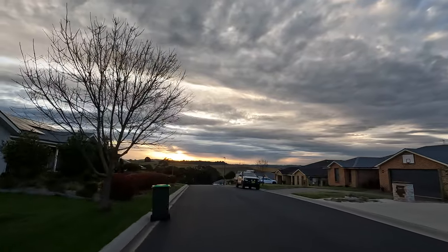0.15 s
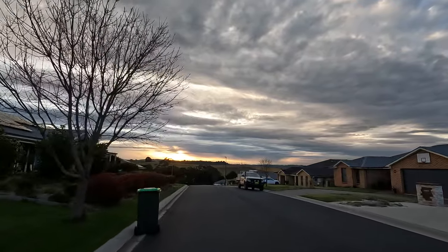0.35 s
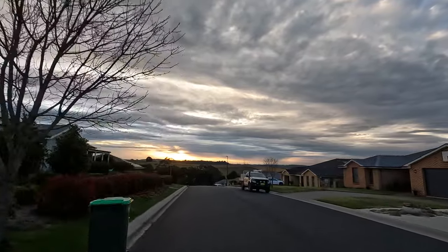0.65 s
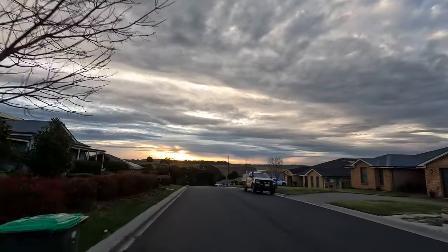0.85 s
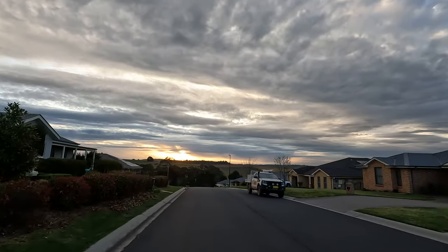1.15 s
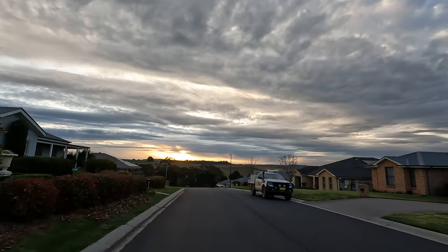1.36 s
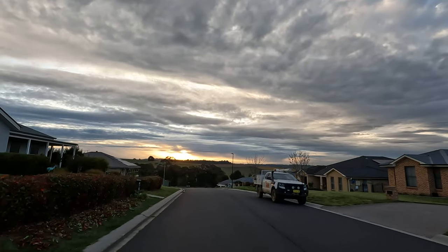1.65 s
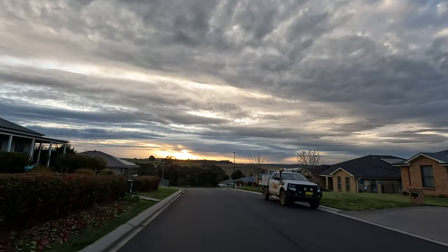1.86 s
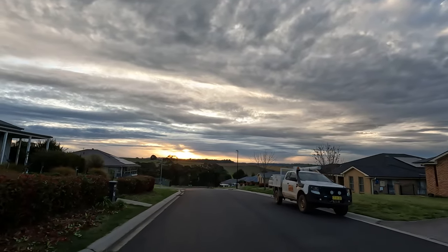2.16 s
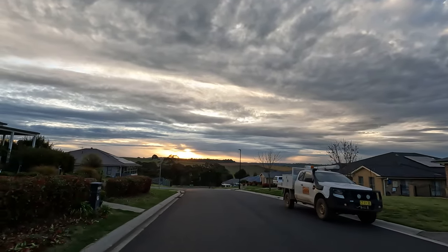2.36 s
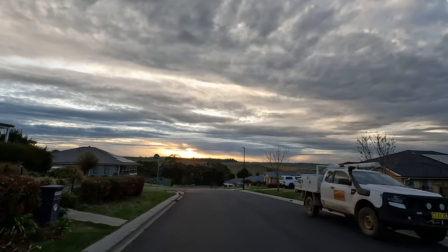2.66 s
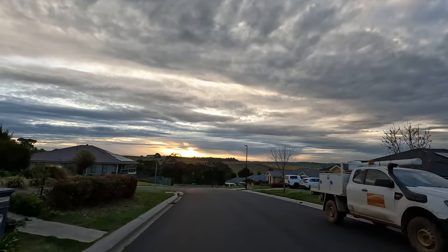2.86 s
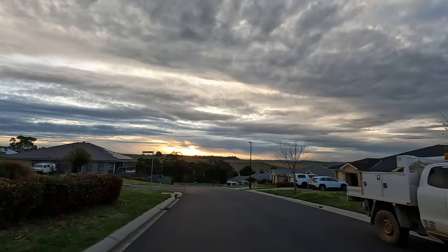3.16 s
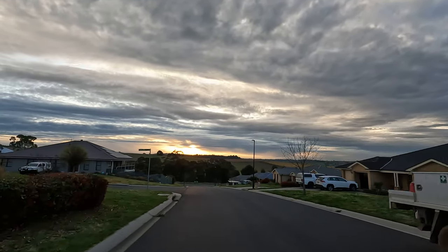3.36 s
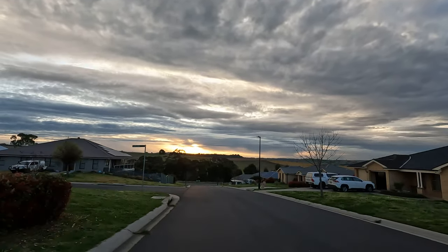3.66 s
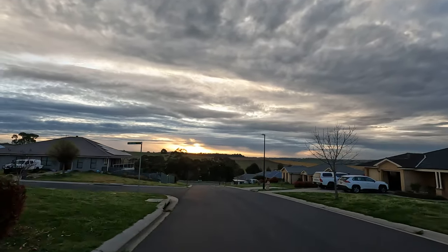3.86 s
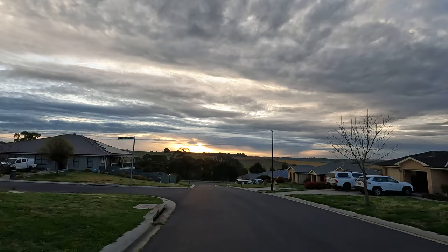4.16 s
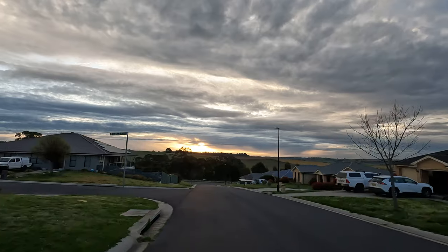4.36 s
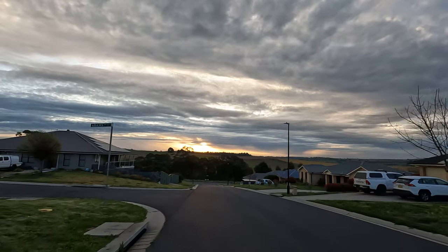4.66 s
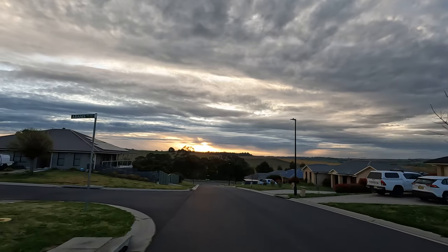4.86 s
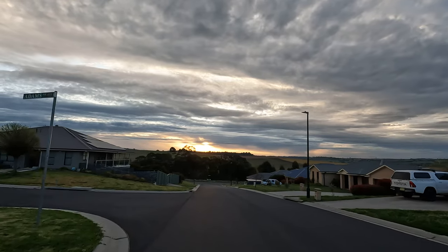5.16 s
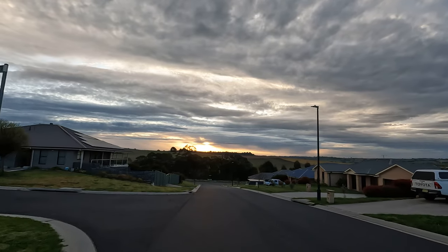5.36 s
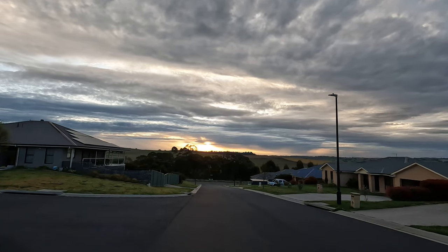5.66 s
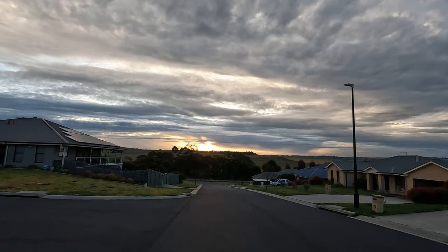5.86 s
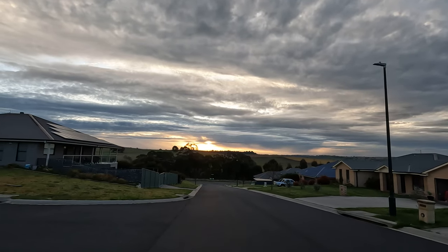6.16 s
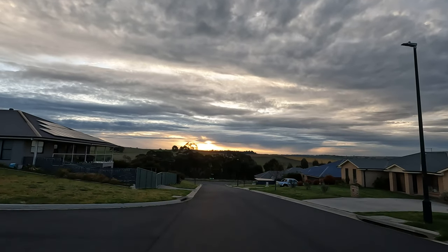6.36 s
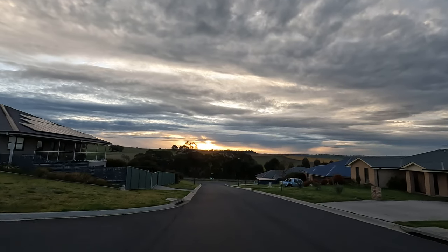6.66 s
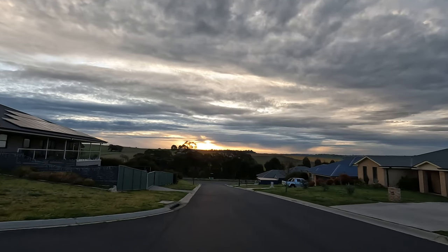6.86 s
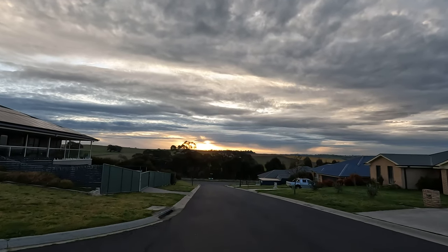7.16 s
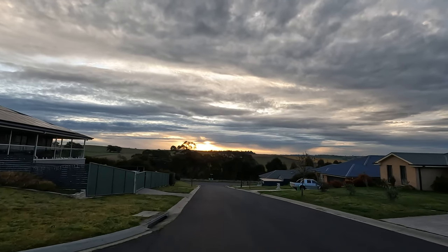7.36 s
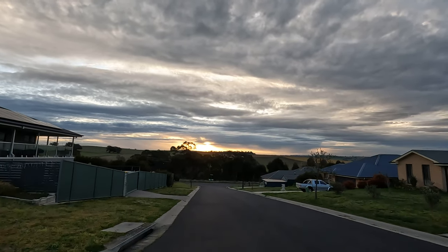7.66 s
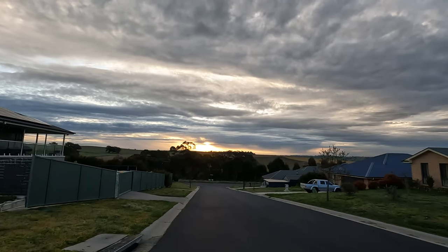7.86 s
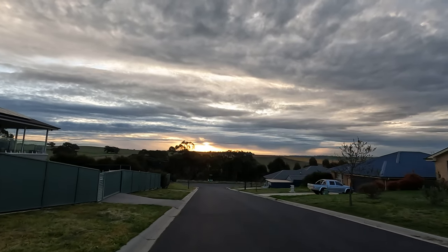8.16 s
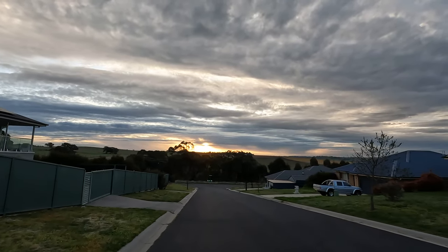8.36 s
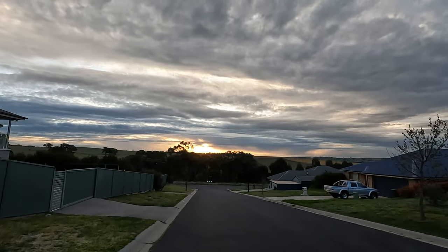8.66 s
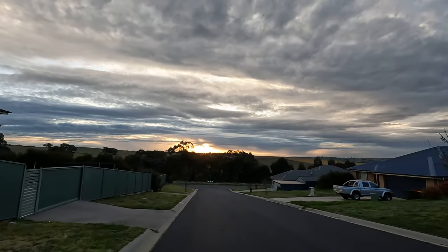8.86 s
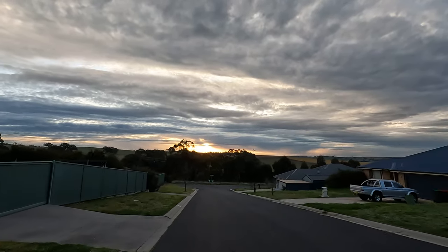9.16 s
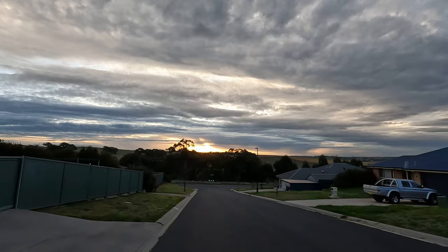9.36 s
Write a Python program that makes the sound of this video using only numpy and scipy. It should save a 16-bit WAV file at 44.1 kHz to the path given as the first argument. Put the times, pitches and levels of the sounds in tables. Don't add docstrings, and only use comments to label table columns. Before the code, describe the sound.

An electric scooter's steady motor hum rides over wind rumble and tyre roar on asphalt, a stone cracks the deck, and the motor judders at the end.

```python
import sys
import numpy as np
from scipy import signal
from scipy.fft import rfft, irfft, next_fast_len
from scipy.io import wavfile
from scipy.ndimage import uniform_filter1d

SR = 44100
rng = np.random.default_rng(int(sys.argv[2]) if len(sys.argv) > 2 else 0)


def transcribe(signal):
    frames = np.atleast_2d(signal).T
    limited = np.clip(frames, -1, 1)
    pcm = np.round(limited * 32767).astype(np.int16)
    wavfile.write(sys.argv[1], SR, pcm)


def natural_amplitude(level_db):
    exponent = np.asarray(level_db, float) / 20
    return 10 ** exponent


N = 419832
TIME = np.arange(N) / SR


def rms_one(x):
    return x / np.sqrt(np.mean(x ** 2) + 1e-20)


def in_time(rows):
    s, *columns = np.transpose(rows)
    return [np.interp(TIME, s, c) for c in columns]


def swell(s, attack_s, hold_s, release_s):
    return np.interp(TIME, s + np.cumsum([0, attack_s, hold_s, release_s]), [0, 1, 1, 0])


def drift(rate):
    thin, settle = 40, 2000
    r = np.exp(-2 * thin * np.pi * rate / SR)
    white = rng.standard_normal(N // thin + settle + 2)
    slow = signal.lfilter([1], [1, -2 * r, r * r], white)[settle:]
    return np.interp(np.arange(N) / thin, np.arange(len(slow)), rms_one(slow - slow.mean()))


def coloured(spectrum, patchy_db, rate):
    hz, db = np.transpose(spectrum)
    size = next_fast_len(N)
    octave = np.log2(np.maximum(np.fft.rfftfreq(size, 1 / SR), 1))
    shaped = rfft(rng.standard_normal(size)) * natural_amplitude(np.interp(octave, np.log2(hz), db, -120, -120))
    out, together = 0, drift(rate / 3)
    for centre in np.arange(np.log2(hz[0]), np.log2(hz[-1]) + .5, .5)[:10]:
        band = np.cos(np.pi * np.clip(octave - centre, -.5, .5)) ** 2
        flicker_db = patchy_db * (0.81 * together + drift(rate))
        out = out + natural_amplitude(flicker_db) * irfft(shaped * band, size)[:N]
    return rms_one(out)


def resonant(x, hz, width_hz):
    r = np.exp(-np.pi * width_hz / SR)
    poles = [1, -2 * r * np.cos(2 * np.pi * hz / SR), r * r]
    return signal.lfilter(np.array([1, 0, -1]) * (1 - r * r) / 2, poles, x)


def narrow_noise(hz, width_hz):
    return rms_one(resonant(resonant(rng.standard_normal(N), hz, width_hz), hz, width_hz))


def tone(hz):
    return np.sqrt(2) * np.sin(2 * np.pi * np.cumsum(hz) / SR)


def puff(white, peak_ms):
    x = 1000 * np.arange(len(white)) / SR / peak_ms
    return white * x * np.exp(1 - x)


def hush():
    drops_s, rise_s = 4.96, 1
    return 1 - np.exp(-np.maximum(TIME - drops_s, 0) / rise_s)


def lull():
    return swell(5.27, attack_s=.11, hold_s=.11, release_s=.22)


# (time [s], magnet tone [Hz], hum level [dB], deck ringing [dB])
MOTOR_PULLS = [(0, 315.7, -24.5, -29), (.5, 313.4, -24.5, -29.5), (1.3, 313.6, -23.5, -31),
               (1.9, 317, -27.5, -33.5), (2.22, 317.8, -22.5, -24.5), (2.75, 320.5, -25.5, -37),
               (3.05, 323, -25, -32), (3.42, 324.6, -42.5, -46), (3.55, 321.4, -55, -41),
               (3.75, 314, -34.5, -31.5), (4.1, 320.5, -29, -33), (4.7, 319.7, -29, -29.5),
               (5.2, 320.2, -33.5, -36), (5.4, 326.3, -38.5, -36), (6.05, 329, -38.5, -37),
               (6.4, 335.3, -54, -36.5), (8.1, 313, -57, -31.5), (9.52, 302, -62.5, -37)]
# (time [s], length [s], change [dB])
DRIVE_SLACK = [(3.6, .12, -10), (4.03, .02, -4), (4.34, .05, -5), (4.46, .1, 2), (4.84, .02, -7),
               (5.04, .03, -3), (5.19, .05, 4), (5.3, .04, -4), (5.52, .02, -3), (6.03, .04, -4),
               (6.2, .1, 7)]


def motor():
    deck_hz, deck_width_hz, edge_s = 336.7, 28, .03
    hz, hum_db, deck_db = in_time(MOTOR_PULLS)
    loose = np.clip((TIME - 3.5) / 2, 0, 1)
    hz = hz + (.4 + 1.6 * loose) * drift(6.0)
    hum_db = hum_db + sum(db * swell(s, edge_s, length, edge_s) for s, length, db in DRIVE_SLACK)
    hum = tone(hz) * natural_amplitude((1.0 + 1.5 * hush()) * drift(27.0)) + natural_amplitude(-25.5) * tone(2 * hz)
    deck = 0.5 * narrow_noise(deck_hz, deck_width_hz)
    deck = deck + (0.45 - 0.15 * hush()) * tone(deck_hz + 17 * drift(13.78))
    still_db = -9 * swell(8.44, attack_s=.05, hold_s=.62, release_s=.05)
    return natural_amplitude(hum_db) * hum + natural_amplitude(deck_db + still_db + 1.2 * drift(9.1)) * deck


# (time [s], length [s], start pitch [Hz], end pitch [Hz], level [dB])
JUDDER_SURGES = [(8.5, .11, 314, 330, -27), (8.63, .065, 322, 342, -25), (8.72, .16, 318, 322, -27.5),
                 (8.88, .06, 326, 350, -28), (8.945, .05, 350, 342, -28.5), (9.01, .07, 324, 350, -26),
                 (9.13, .04, 330, 324, -35), (9.26, .04, 330, 338, -35), (9.355, .025, 335, 331, -27),
                 (9.41, .025, 328, 324, -30), (9.5, .02, 335, 340, -31)]


def judder():
    edge_s, grows_db = 0.014, 2
    s, length, from_hz, to_hz, db = np.transpose(JUDDER_SURGES)
    ends = np.ravel([s, s + length], order="F")
    hz = np.interp(TIME, ends, np.ravel([from_hz, to_hz], order="F")) + 2.5 * drift(26.0)
    level_db = np.interp(TIME, ends, np.ravel([db - grows_db / 2, db + grows_db / 2], order="F"))
    surges = [swell(start - edge_s, edge_s, span, edge_s) for start, span in zip(s, length)]
    level = np.max(surges, axis=0) * natural_amplitude(level_db - 1.5 + 2.5 * drift(22.0))
    return level * (tone(hz) + natural_amplitude(-23.0) * tone(2 * hz))


# (time [s], roar level [dB], brightness [dB], air hiss over the mudguard [dB])
TYRE_COURSE = [(0, -38, 0.5, -71.5), (.48, -37.5, -0.5, -72), (1.14, -38.5, -0.5, -67),
               (1.9, -38, -0.5, -69.5), (2.25, -33.5, -0.5, -66), (2.8, -38.5, 1.5, -66.5),
               (3.47, -40, 2.5, -67.5), (3.7, -38, 2, -67), (4.08, -39, 2, -67), (5.2, -38, 2.5, -65.5),
               (5.6, -40, 1.5, -69.5), (6, -35.5, 1, -69), (6.47, -34.5, 0.5, -67), (6.9, -31.5, 1, -67),
               (7.95, -33.5, 1.15, -64.5), (8.65, -31.5, 1.5, -63.5), (9.1, -34, 2, -61.5),
               (9.52, -32.5, 1.5, -61)]
# (frequency [Hz], density [dB per Hz])
ROAR_SPECTRUM = [(60, -23.5), (140, -9), (240, -2), (400, 0.5), (600, -2), (800, -9.5), (1100, -17.5),
                 (1500, -30)]
SING_SPECTRUM = [(650, -6.5), (900, 1), (1200, -1), (1400, -5), (1620, -13), (1750, -22.5), (2100, -30)]
TREAD_SPECTRUM = [(1100, -15.5), (1700, 1.5), (2000, 0.5), (2650, -5.5), (3000, -9), (3500, -11),
                  (4100, -23), (5000, -39)]
AIR_SPECTRUM = [(3200, -2), (4200, 1), (5500, 0.5), (7400, -4.5), (8500, -15), (10500, -20), (12300, -27),
                (15500, -36)]
# (frequency [Hz], width [Hz], level [dB])
TREAD_RESONANCES = [(1483, 340, -2.5), (2510, 600, -1)]


def road():
    roar_db, bright_db, air_db = in_time(TYRE_COURSE)
    calm, duck_db = hush(), -8 * lull()
    sing_db = -37.5 - 10 + 0.8 * (roar_db + 38) + bright_db + 1.5 * calm
    tread_db = -37.5 - 18.5 + 0.86 * (roar_db + 38) + 2.5 * bright_db
    roar = natural_amplitude(roar_db) * coloured(ROAR_SPECTRUM, patchy_db=0.6, rate=4.5)
    sing = natural_amplitude(sing_db + 0.36 * duck_db) * coloured(SING_SPECTRUM, patchy_db=0.67, rate=10.0)
    tread = sing + natural_amplitude(tread_db + duck_db) * coloured(TREAD_SPECTRUM, patchy_db=0.65, rate=12.0)
    lift = sum(natural_amplitude(db) * resonant(tread, hz, width) for hz, width, db in TREAD_RESONANCES)
    tread = tread + calm * lift
    tread = tread - 0.47 * calm * resonant(tread, hz=1750, width_hz=160)
    air = natural_amplitude(air_db + 0.55 * duck_db) * coloured(AIR_SPECTRUM, patchy_db=1.0, rate=12.0)
    return roar + tread + air


# (time [s], gust level [dB])
WIND_GUSTS = [(0, -32.5), (.4, -28.5), (.8, -25.5), (1.3, -23), (1.75, -23), (2.15, -16.5), (2.9, -21),
              (3.7, -20.5), (4.6, -23), (5.2, -20.5), (5.42, -25), (5.56, -36.5), (5.95, -39), (7.0, -41),
              (7.9, -38.5), (9.15, -36.5), (9.38, -26.5), (9.52, -34)]
# (frequency [Hz], density [dB per Hz])
BUFFET_SPECTRUM = [(12, 0.5), (25, -3.5), (42, -3.5), (70, -23), (110, -36.5)]
GUST_SPECTRUM = [(30, -6.5), (55, -0.5), (120, 0.5), (200, -5.5), (280, -10.5), (420, -23.5), (700, -35.5)]


def wind():
    gust_db, = in_time(WIND_GUSTS)
    hushed_s = np.maximum(TIME - 4.96, 0)
    buffet_db = -27.5 + 0.64 * (np.maximum(gust_db, -31) + 20.5)
    buffet_db = buffet_db + 1.5 * hushed_s - 11.0 * lull()
    deep = natural_amplitude(buffet_db) * coloured(BUFFET_SPECTRUM, patchy_db=1.5, rate=5.2)
    rumble_db = gust_db + 1.5 - 4.3 * hush()
    return deep + natural_amplitude(rumble_db) * coloured(GUST_SPECTRUM, patchy_db=1.2, rate=6.5)


# (time [s], level [dB], edge sharpness [dB])
STONE_CONTACTS = [
    (3.6008, -23, -11),
    (3.6044, -24, 1),
    (3.6072, -31, 0),
    (3.6105, -33, -9),
]
# (frequency [Hz], level [dB], decay time t60 [s])
DECK_MODES = [(1160, -5, 0.076), (1595, -6, 0.097), (2230, 3, 0.03), (2980, -8, 0.035), (3550, -8, 0.035),
              (4120, -8, 0.027), (4870, -7, 0.022), (5500, -11, .02), (5900, -7.5, 0.028),
              (7080, -12, .015), (7770, -8, 0.018), (9750, -12, 0.014), (12300, -11, .015),
              (14200, -12, .01)]


def stone():
    s, db, edge_db = np.transpose(STONE_CONTACTS)
    start, size = int(s[0] * SR), SR // 4
    at = (s * SR).astype(int) - start
    hit, out = np.zeros(size), np.zeros(N)
    for hz, mode_db, t60 in DECK_MODES:
        sharp_db = edge_db * (4500 < hz < 9000)
        strike_db = db + mode_db + sharp_db - 7.5 + rng.normal(0, 1.5, len(at))
        clicks = np.zeros(size)
        clicks[at] = natural_amplitude(strike_db) * rng.choice([-1, 1], len(at))
        r, w = natural_amplitude(-60 / (0.66 * t60 * SR)), 2 * np.pi * hz / SR
        hit += signal.lfilter([0, np.sin(w)], [1, -2 * r * np.cos(w), r * r], clicks)
    clicks = np.zeros(size)
    clicks[at] = natural_amplitude(db - 4.0)
    crack_s = 0.0024
    decay = signal.lfilter([1], [1, -np.exp(-1 / (crack_s * SR))], clicks)
    crack_band = signal.butter(2, [900, 1.04 * 5750], "band", fs=SR, output="sos")
    hit += signal.sosfilt(crack_band, decay * rng.standard_normal(size))
    out[start:start + size] = signal.sosfilt(signal.butter(2, 7700, fs=SR, output="sos"), hit)
    haze_band = signal.butter(1, [2500, 8000], "band", fs=SR, output="sos")
    haze = rms_one(signal.sosfilt(haze_band, rng.standard_normal(N)))
    return out + natural_amplitude(-61) * swell(3.578, attack_s=.015, hold_s=.02, release_s=.04) * haze


# (time [s], peak level [dB], brightest frequency [Hz], lowest frequency [Hz], relative top level [dB])
GRIT_GRAINS = [(0.1475, -49.5, 6200, 3800, -16), (0.186, -58, 6500, 4500, -29),
               (0.5704, -61, 7500, 3000, -19), (0.6809, -51, 5700, 3600, -17.5),
               (1.077, -43.5, 5900, 3800, -19), (1.8794, -60, 5500, 3500, -31),
               (3.1394, -59, 5010, 3500, -39), (3.9424, -45, 5630, 4500, -26), (4.17, -59, 9800, 8800, -16),
               (4.529, -64, 9600, 8540, -20), (5.0194, -60, 10200, 8500, -18),
               (5.203, -54, 9500, 6000, -18), (5.249, -44.5, 6200, 5200, -26),
               (5.7788, -52, 6000, 5200, -10), (5.7995, -61, 7100, 6600, -16),
               (5.8122, -42.5, 6900, 3300, -10), (5.8175, -50.5, 7100, 6500, -16),
               (5.829, -59, 8800, 5000, -14), (5.9363, -54, 5700, 4800, -15), (6.241, -54, 4910, 3800, -20),
               (6.6594, -62, 8250, 4540, -22), (7.0373, -46, 6640, 2600, -34),
               (7.7187, -54, 7000, 5900, -39), (8.2, -58, 5000, 3830, -35), (8.5894, -55, 5600, 5200, -33),
               (9.011, -36, 6850, 3300, -25), (9.0493, -36.5, 7500, 3000, -26),
               (9.148, -53, 5650, 3900, -35), (9.185, -43, 7400, 3300, -28), (9.31, -53, 6500, 5200, -28)]


def grit():
    size = 1500
    top = signal.butter(2, [11500, 12900], "band", fs=SR, output="sos")
    out, noise = np.zeros(N + size), rng.standard_normal((len(GRIT_GRAINS), size))
    for (s, db, hz, low_hz, top_db), white in zip(GRIT_GRAINS, noise):
        tick = puff(white, peak_ms=1.8)
        wide = signal.sosfilt(signal.butter(4, low_hz, "high", fs=SR, output="sos"), tick)
        wide = signal.sosfilt(signal.butter(4, 0.99 * hz, fs=SR, output="sos"), wide)
        ring = resonant(resonant(tick, hz, width_hz=600), hz, width_hz=600)
        edge = rms_one(signal.sosfilt(top, tick)) + 0.4 * rms_one(resonant(tick, hz=14300, width_hz=1500))
        body = resonant(wide, 1.2 * low_hz, width_hz=900)
        grain = rms_one(wide) + .6 * rms_one(body) + .5 * rms_one(ring) + natural_amplitude(top_db + 4.0) * edge
        out[round(s * SR):][:size] += natural_amplitude(db) * grain / np.abs(grain).max()
    return out[:N]


# (time [s], length [s], level [dB])
DRONE_SPELLS = [
    (5.68, .1, -44),
    (5.94, .1, -47),
    (6.139, 0.25, -47),
    (6.601, 0.073, -44),
    (6.82, 0.24, -39),
    (7.1, .17, -43),
    (7.302, 0.18, -41.5),
    (7.8, 0.13, -56),
    (8.2, 0.61, -47.5),
]


def drone():
    edge_s = 0.031
    level = sum(natural_amplitude(db) * swell(s - edge_s, edge_s, length, edge_s) for s, length, db in DRONE_SPELLS)
    return level * natural_amplitude(2.5 * drift(9.0)) * tone(174 + 3 * drift(8.0))


# (time [s], whine level [dB])
CONTROLLER_DRIVE = [(0, -92), (.7, -89.5), (1.2, -76.5), (1.6, -84.5), (2.3, -80), (4.5, -79.5), (5.2, -79),
                    (5.6, -95), (7.8, -91.5), (8.6, -85), (9.52, -81.5)]
# (frequency [Hz], width [Hz], level [dB])
SWITCHING_BANDS = [(7822, 10, -12), (7770, 320, -3), (8142, 8, -10), (8230, 260, 1.5), (8630, 14, -14),
                   (8750, 200, -5), (9050, 300, -8)]
# (time [s], length [s])
HIGH_BAND_SPELLS = [
    (-.4, 2.2),
    (2.9, 3.47),
]


def whine():
    drive_db, = in_time(CONTROLLER_DRIVE)
    awake = np.clip(TIME / 2.8, .3, 1)
    bands = sum(natural_amplitude(db) * narrow_noise(hz, width) for hz, width, db in SWITCHING_BANDS)
    on = sum(swell(s, .35, length, 0.04) for s, length in HIGH_BAND_SPELLS)
    high = narrow_noise(hz=12200, width_hz=1150) + natural_amplitude(-9.0) * narrow_noise(hz=13700, width_hz=1800)
    high = on * natural_amplitude(-90.5 + 2.2 * drift(12.0) + .8 * drift(1.5)) * high
    frame_level = awake * natural_amplitude(drive_db + 24) + natural_amplitude(-59.5) * hush() ** 4
    frame = frame_level * narrow_noise(hz=1598, width_hz=50)
    return frame + natural_amplitude(drive_db + .5 * drift(4.2)) * bands + high


def scuff():
    brush = narrow_noise(hz=3200, width_hz=140) + 0.4 * narrow_noise(hz=3850, width_hz=140)
    brush = brush + natural_amplitude(-7.0) * narrow_noise(hz=7000, width_hz=3300)
    return natural_amplitude(-63.5) * swell(.56, attack_s=.015, hold_s=.035, release_s=.05) ** 2 * brush


# (time [s], peak level [dB], ring frequency [Hz])
DUST_TICKS = [(0.382, -67, 9020), (0.9338, -68, 9570), (2.368, -70, 9010), (2.9901, -72, 9040),
              (3.05, -68.5, 9340), (4.4832, -71, 9670), (4.5815, -66, 9000), (4.6009, -62, 9170),
              (4.6372, -69.5, 10100), (4.8404, -71, 9100), (4.8588, -67, 9000), (4.9891, -64, 9260),
              (5.5283, -70, 9250), (5.9017, -69.5, 12100), (6.335, -67.5, 12100), (6.4832, -67, 12470),
              (7.2592, -71, 10400), (7.5767, -77, 9130), (8.3406, -74, 9900), (8.772, -69, 8930),
              (9.1341, -71, 9680), (9.3038, -68, 9000)]


def dust():
    size, width_hz = 600, 1500
    out, noise = np.zeros(N + size), rng.standard_normal((len(DUST_TICKS), size))
    for (s, db, hz), white in zip(DUST_TICKS, noise):
        tick = resonant(resonant(puff(white, peak_ms=1.2), hz, width_hz), hz, width_hz)
        out[round(s * SR):][:size] += natural_amplitude(db - 1) * tick / np.abs(tick).max()
    return out[:N]


def squeak():
    start_s, fall_hz_per_s = 1.2, 1200
    hz = 8290 - fall_hz_per_s * np.clip(TIME - start_s, 0, 1)
    return natural_amplitude(-75) * swell(start_s, attack_s=.04, hold_s=.12, release_s=.06) * tone(hz)


def treble_gate(x):
    size, group = 2048, 16
    half = size // 2
    hz, s, cells = signal.stft(x, SR, nperseg=size)
    power = (np.abs(cells[:, :half]) ** 2).reshape(len(x), half // group, group, -1).mean(axis=2)
    power = uniform_filter1d(power, size=2, axis=2)
    threshold_db = -114.5 - 1.5 * hush() + 1.8 * drift(9.0)
    gate_db = np.interp(s, TIME, threshold_db)
    shut = np.repeat(power < natural_amplitude(2 * gate_db), group, axis=1) & (hz[:half, None] > 8600)
    cells[:, :half] *= np.where(shut, natural_amplitude(-20), 1)
    return signal.istft(cells, SR, nperseg=size)[1][:, :N]


def scene():
    ride = motor() + judder() + road() + wind()
    strikes = stone() + grit() + dust()
    return (ride + strikes + drone() + whine() + scuff() + squeak())[None]


def top_cut(x):
    return signal.sosfilt(signal.butter(12, 15600, fs=SR, output="sos"), x)


def record(dry):
    fade_s = .004
    fade = np.clip((N - np.arange(N)) / SR / fade_s, 0, 1)
    rounded = 0.62 * np.tanh(fade * dry / 0.59)
    mix = treble_gate(rounded)
    return top_cut(mix)


dry = scene()
out = record(dry)
transcribe(out)
```